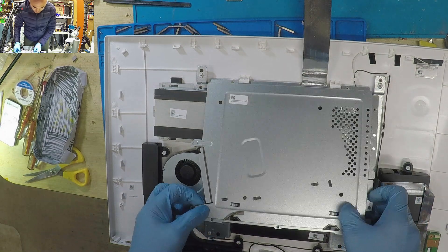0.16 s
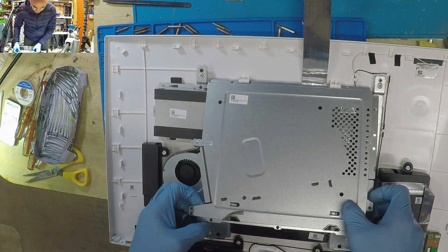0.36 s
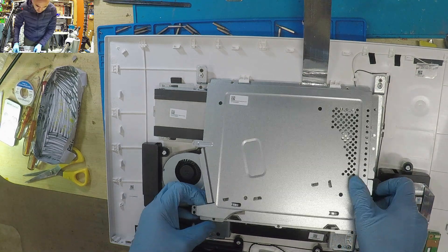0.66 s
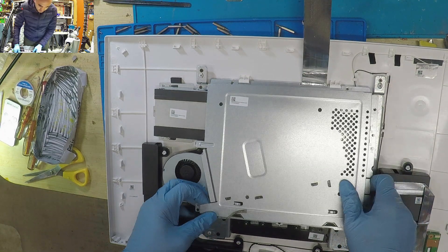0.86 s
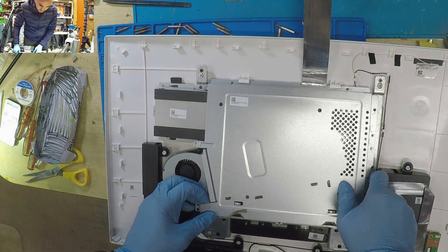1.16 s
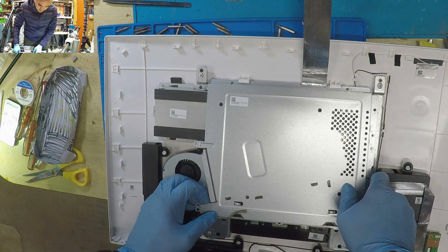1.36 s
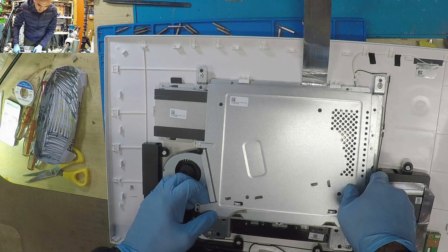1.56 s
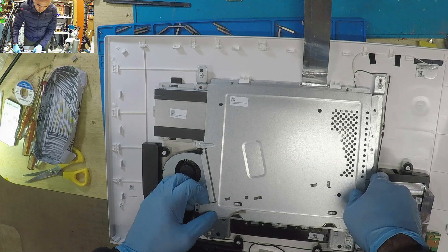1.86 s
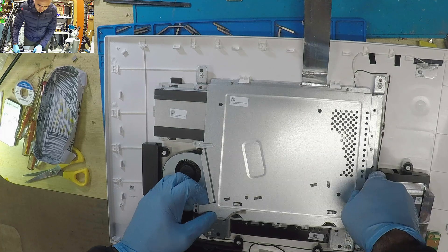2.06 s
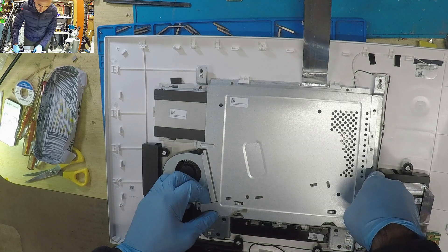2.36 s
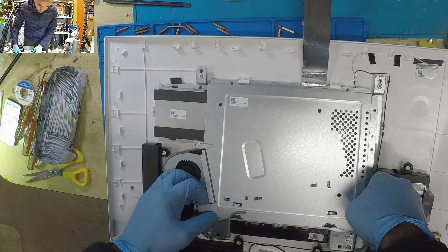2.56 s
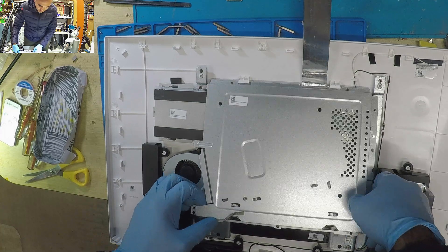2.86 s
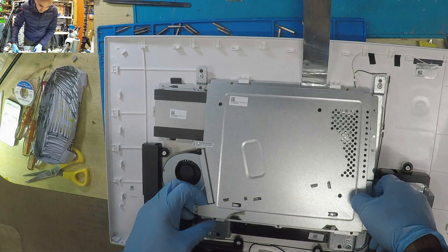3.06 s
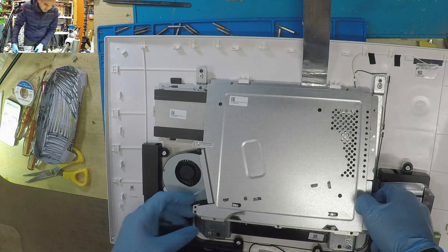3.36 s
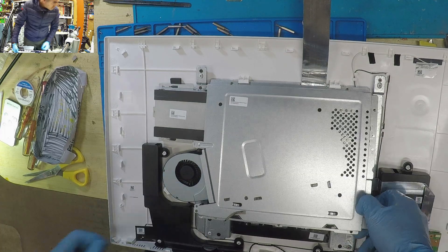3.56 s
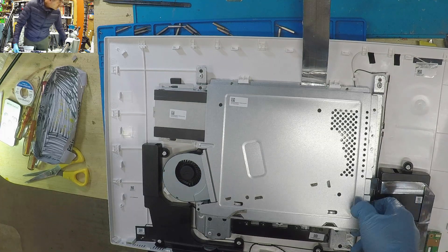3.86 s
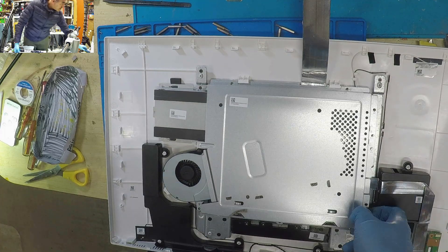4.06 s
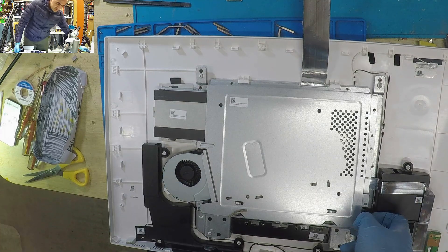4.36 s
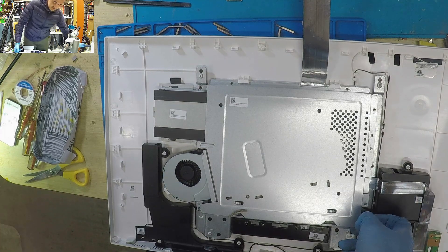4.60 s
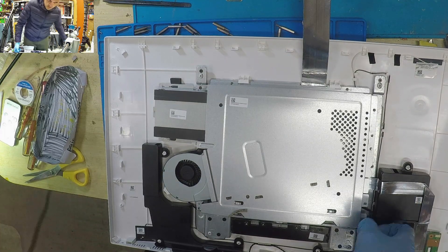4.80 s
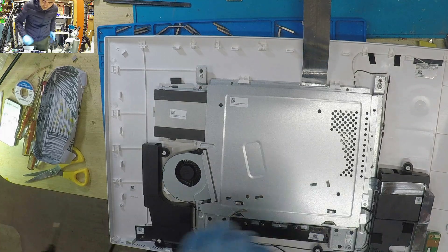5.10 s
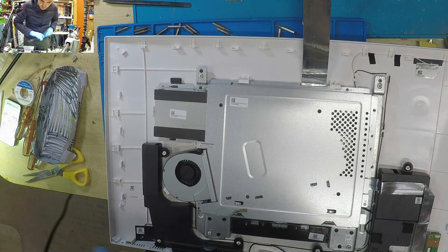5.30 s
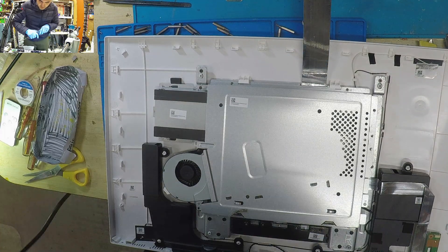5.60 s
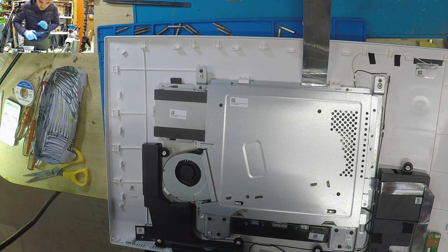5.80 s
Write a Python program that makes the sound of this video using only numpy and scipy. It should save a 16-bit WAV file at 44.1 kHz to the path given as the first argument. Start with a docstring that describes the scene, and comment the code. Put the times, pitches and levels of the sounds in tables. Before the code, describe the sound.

Close stereo sound of bench handling: deep soft thumps with short hollow ringing, quiet murmuring pressure between them, and small ticks. Early low sway fades out; a heavy thud lands midway, then another late, followed by brighter glove and sleeve scuffs and a crisp rattling knock. Faint steady air hiss fills the workshop.

```python
"""Seating a sheet-metal cover

Gloved hands press a sheet-metal cover over a board lying in a plastic shell on a workbench.
Every push and knock shakes the bench and the microphone stand: damped modes swell and ring as decaying sines.
Steady handling drives the same modes as noise-fed resonators; small parts tick in short bursts of filtered noise.
Gloves and sleeves hiss as they slide, in bands of noise, over a low rumble that dies away and a faint workshop hiss.
"""
import sys
import numpy as np
from scipy import signal
from scipy.io import wavfile

SR = 44100
rng = np.random.default_rng(int(sys.argv[2]) if len(sys.argv) > 2 else 0)


def master_out(mix):
    """Clip the mix to full scale and print it as 16-bit PCM to the path in sys.argv[1]."""
    frames = np.transpose(np.atleast_2d(mix))
    ceiling = np.clip(frames, -1, 1)
    pcm = np.round(ceiling * 32767).astype(np.int16)
    wavfile.write(sys.argv[1], SR, pcm)


N = 261954   # samples


def from_db(db):
    """Level to amplitude: 20 dB is a factor of ten."""
    return 10 ** (np.asarray(db) / 20)


def rms_one(x):
    """Power normalization: scale to rms 1."""
    return x / np.sqrt(np.mean(x ** 2) + 1e-20)


def in_time(rows):
    """Linear interpolation: the columns of a curve table, one value a sample."""
    seconds, *columns = np.transpose(rows)
    t = np.arange(N) / SR
    return [np.interp(t, seconds, column) for column in columns]


def at_hz(points, hz):
    """Logarithmic frequency scale: read a spectrum at the given frequency."""
    table_hz, values = np.transpose(points)
    return np.interp(np.log(hz), np.log(table_hz), values)


def drift(rate_hz):
    """Low-passed random fluctuation: noise at every 40th sample through a double pole; spread 1."""
    pole = np.exp(-80 * np.pi * rate_hz / SR)
    white = rng.standard_normal(N // 40 + 2002)
    slow = signal.lfilter([1], [1, -2 * pole, pole * pole], white)[2000:]   # without the run-in
    return np.interp(np.arange(N) / 40, np.arange(len(slow)), rms_one(slow))


def sides(angle):
    """Mid-side panning: left and right gain of a mode from its angle, alike on both sides, on one side only, or
    opposed."""
    return np.array([np.cos(angle) + np.sin(angle), np.cos(angle) - np.sin(angle)])


def swell(t, rise, t60):
    """Forced growth and free decay: a smooth rise, then a fall of 60 dB in t60 seconds."""
    growth = np.sin(np.pi / 2 * np.minimum(t / rise, 1)) ** 2
    return growth * from_db(-60 * np.maximum(t - rise, 0) / t60)


# Balance of the microphone pair. Each row: frequency in Hz, left minus right in dB.
PAIR_BALANCE = [(100, -2.5), (300, -6.5), (1000, 0.5), (6000, 1), (9000, -2.5), (14000, 0)]


def banded_noise(spectrum, likeness, patchy_db):
    """Third-octave synthesis: stereo noise bands with own level, flicker and likeness, as (Hz, band), rms 1 in sum."""
    lowest, highest = spectrum[0][0], spectrum[-1][0]
    edges = lowest * 2 ** np.arange(0, np.log2(highest / lowest) + 1 / 3, 1 / 3)
    white = rng.standard_normal((2, 2, N))   # neighbouring bands get unrelated noise
    opposed = np.array([[1], [-1]])
    bands = []
    for k, (low, high) in enumerate(zip(edges, edges[1:])):
        band_filter = signal.butter(2, [low, high], "band", fs=SR, output="sos")
        mid, side = signal.sosfilt(band_filter, white[k % 2])
        hz = np.sqrt(low * high)
        alike = np.clip(at_hz(likeness, hz), -1, 1)
        pair = np.sqrt(1 + alike) * mid + np.sqrt(1 - alike) * side * opposed
        flicker_db = patchy_db * drift(22)
        gain = from_db(at_hz(spectrum, hz) + flicker_db + at_hz(PAIR_BALANCE, hz) / 2 * opposed)
        bands.append((hz, gain * pair))
    total = np.sqrt(np.mean(sum(band for hz, band in bands) ** 2))
    return [(hz, band / total) for hz, band in bands]


# Spectrum of the workshop hiss. Each row: frequency in Hz, relative level in dB per Hz.
WORKSHOP_SPECTRUM = [(59, -59), (100, -43), (140, -6.5), (209, -8.5), (275, 0.5), (355, -11.5), (457, -7),
                     (641, -8.5), (792, -6), (2270, -22), (2990, -26.5), (5000, -33), (5900, -25),
                     (7260, -24.5), (9970, -28), (15500, -44)]
# Its stereo likeness. Each row: frequency in Hz, left-right likeness from -1 (opposed) to 1 (alike).
WORKSHOP_LIKENESS = [(50, 0.92), (200, 0.85), (320, -0.78), (700, -0.87), (1200, -0.7), (2200, -0.49),
                     (3800, 0.33), (6000, -0.03), (15000, -0.084)]
WORKSHOP_DB = -48.5


def workshop():
    """Stationary broadband noise: air and microphone hiss at an almost constant level."""
    bands = banded_noise(WORKSHOP_SPECTRUM, WORKSHOP_LIKENESS, patchy_db=-0.5)
    return from_db(WORKSHOP_DB) * sum(band for hz, band in bands)


# Low sway of the stand. Each row: time in seconds, pitch in Hz, level in dB.
STAND_SWAY = [(0, 52, -33), (.3, 53.1, -34.5), (.58, 52.8, -35.5), (.72, 45.3, -28), (.79, 44.4, -45.5),
              (.93, 48.6, -34.5), (1.07, 57.63, -41), (1.3, 50.7, -44), (1.77, 48.44, -51),
              (1.98, 46.26, -45.5), (2.1, 44.96, -52), (2.3, 45, -85), (5, 52.6, -85), (5.2, 53, -67),
              (5.94, 57.1, -66)]
# Level of the low noise. Each row: time in seconds, level in dB.
RUMBLE_LEVEL = [(0, -35), (.5, -40.5), (.8, -35.5), (1.1, -40.5), (1.9, -47.5), (2.1, -52.5), (3.2, -59.5),
                (3.5, -66), (4.8, -68), (5.94, -71)]
# Spectrum of the low noise. Each row: frequency in Hz, relative level in dB per Hz.
RUMBLE_SPECTRUM = [(12, -46), (20, 3), (38, 0), (55, 1), (84, -5), (110, -9), (140, -36), (240, -120)]


def rumble():
    """Frequency modulation over random noise: the stand sways as a wavering low tone, nearly alike on both sides."""
    hz, level_db = in_time(STAND_SWAY)
    turns = np.cumsum(hz * (1 + 0.015 * drift(2.8))) / SR
    strength = np.sqrt(2) * from_db(level_db + 1.5 * drift(3.9))   # the root makes the level an rms
    tone = strength * np.sin(2 * np.pi * turns) * sides(0.067)[:, None]
    bands = banded_noise(RUMBLE_SPECTRUM, [(20, 1.0), (130, 0.81)], patchy_db=0.5)
    noise_db, = in_time(RUMBLE_LEVEL)
    return tone + from_db(noise_db) * sum(band for hz, band in bands)


# Strokes of gloves and sleeves. Each row: top of the stroke in seconds, level in dB,
# rise in seconds, fall in seconds, brightness in dB.
STROKES = [(1.47, -60.5, 0.11, 0.069, 0), (2.42, -60.5, 0.062, 0.044, -2), (3.52, -47, 0.082, 0.23, 5),
           (4.352, -48.5, 0.19, .17, 4.5), (5.05, -51, 0.19, 0.39, 3.5), (5.31, -44.5, 0.075, 0.068, 8),
           (5.46, -48.5, 0.13, 0.33, 6), (5.619, -46.5, 0.062, 0.065, 9.5), (5.745, -37, 0.034, 0.037, 11),
           (5.9, -47.5, 0.093, 0.24, 4)]
# Spectrum of the rubbing hiss. Each row: frequency in Hz, relative level in dB per Hz.
RUB_SPECTRUM = [(410, -32), (700, 5.5), (1020, -18.5), (1180, -1.5), (1560, -10), (1900, -6.5), (2490, -9),
                (3110, -6.5), (4770, -12.5), (7600, -6.5), (15500, -27.5)]
# Its stereo likeness. Each row: frequency in Hz, left-right likeness from -1 (opposed) to 1 (alike).
RUB_LIKENESS = [(700, -0.6), (1400, 0.32), (2500, 0.57), (3800, 0.7), (5500, 0.4), (9000, 0.35),
                (15000, -0.86)]
RESTING_DB, EDGE_DROP_DB = -63, 10.5   # hiss between strokes; fall of a stroke over its rise or fall time
DULL_DB, SIZZLE_DB = 2, -5   # at zero brightness: added below 5 kHz, above 8.5 kHz
SIZZLE_SHARE = .4   # share of the brightness gained above 8.5 kHz


def sliding():
    """Friction noise: rubber and cloth rub over smooth parts, a grainy hiss that swells with each stroke."""
    t = np.arange(N) / SR
    power, weighted_db = from_db(2 * RESTING_DB), 0   # twice the dB gives power
    for top_s, top_db, rise, fall, bright_db in STROKES:
        distance = np.where(t < top_s, (top_s - t) / rise, (t - top_s) / fall)
        stroke = from_db(2 * (top_db - EDGE_DROP_DB * distance))
        power = power + stroke
        weighted_db = weighted_db + bright_db * stroke
    brightness_db = weighted_db / power
    dull = from_db(DULL_DB - brightness_db)
    sizzle = from_db(SIZZLE_DB + SIZZLE_SHARE * brightness_db)
    hiss = 0
    for hz, band in banded_noise(RUB_SPECTRUM, RUB_LIKENESS, patchy_db=0.5):
        tint = dull if hz < 5000 else sizzle if hz > 8500 else 1
        hiss = hiss + band * tint
    grain = from_db(1.07 * drift(47))
    return np.sqrt(power) * grain * hiss


# Small hard contacts. Each row: start in seconds, level in dB, pitch in Hz, t60 in seconds,
# broad crack in dB relative to the level, hollow body in dB relative to the level.
TICKS = [(.954, -57, 2090, 0.059, -3, 1), (1.432, -56, 2550, 0.048, -3, -12),
         (1.457, -52.5, 3210, 0.027, -3, -15), (1.483, -49, 2700, 0.024, -3, -5),
         (2.338, -58, 1960, 0.16, -4, 7), (2.412, -52.5, 3900, .05, 2, -0.5),
         (4.1149, -47, 4020, 0.046, 3, 5), (5.435, -40.5, 6700, .024, -0.5, -11.5),
         (5.68, -47.5, 9300, 0.034, -10, -20), (5.79, -37.5, 8720, 0.031, -16, -21),
         (5.808, -43, 2280, 0.028, -3, 14), (5.879, -48, 6060, 0.034, 4, 1)]


def ticks():
    """Impulsive excitation: a hard edge catches, a short crack with a hump at its pitch and a hollow shell note."""
    out, t = np.zeros((2, N + SR)), np.arange(SR // 8) / SR
    for start_s, level_db, hz, t60, broad_db, body_db in TICKS:
        t60 = max(t60, .005)
        noise = rng.standard_normal((2, len(t)))
        noise = noise[0] + 0.42 * noise[1] * [[1], [-1]]
        layers = []
        for edges in [(hz * .75, hz * 1.2), (2000, 8800), (900, 2000)]:
            band = signal.butter(4, edges, "band", fs=SR, output="sos")
            layers.append(rms_one(signal.sosfilt(band, noise)))
        hump, broad, body = layers
        crack = (hump + from_db(broad_db) * broad) * swell(t, 0.0013, t60)
        hollow = from_db(body_db) * body * swell(t, 0.0011, 2.65 * t60)
        at = round(start_s * SR)
        out[:, at:at + len(t)] += from_db(level_db) * (crack + hollow)
    return out[:, :N]


# Modes of bench, shell and cover. Each row: frequency in Hz, relative level in dB, nominal t60 in seconds,
# stereo angle in radians (0 centre, -0.8 right only, 1.57 opposed).
BODY_MODES = [(145.5, -3.5, 0.41, 0.72), (173.3, -5.5, 0.24, 0.34), (194.2, -0.5, 0.23, -0.19),
              (205.84, -1.5, 0.34, -0.18), (223.4, -0.5, 0.32, -0.17), (285, -2, 0.11, -1),
              (319.7, -2.5, 0.52, -1.11), (352, -7, 0.14, 0.5), (402.6, 2.5, 0.19, -1),
              (447.5, 3.5, 0.16, 0.5), (483, -2, 0.3, -0.7), (570, 4.5, 0.22, 0.63), (625, 2, 0.12, 2),
              (693, 0.5, 0.25, -1.32), (757, -0.5, 0.1, -1.1), (865, 3, 0.11, -1.3),
              (1016, -1, 0.14, -1.18), (1240, -10, 0.099, 5.5), (1225, -12, 0.11, 3.4),
              (1336, -14, 0.27, 2.14), (1450, -27, 0.099, -3.5), (1777, -12, 0.07, -1.2),
              (2250, -9.5, 0.045, 0.73)]
DEEP_TOP_HZ, MIDDLE_TOP_HZ = 250, 530   # limits of the deep and middle modes
# Hands resting and shifting on the parts. Each row: time in seconds, level of the deep modes in dB,
# level of the higher modes in dB relative to the deep ones.
HANDLING = [(0, -44.5, -4.5), (.43, -50, -3.5), (.92, -44.5, -5), (1.21, -43, -2.5), (2.3, -42, -5.5),
            (2.9, -45, -3.5), (3.47, -49.5, -0.5), (3.75, -40.5, -10), (4.7, -47.5, -10), (5.18, -44, -2),
            (5.6, -47.5, -15.5), (5.94, -46, 11.5)]


def handling():
    """Randomly forced resonance: an unsteady pressure keeps the lowest 17 modes murmuring."""
    deep_db, higher_db = in_time(HANDLING)
    deep, higher = np.zeros((2, N)), np.zeros((2, N))
    for hz, mode_db, t60, angle in BODY_MODES[:17]:
        pole = from_db(-60 / (0.45 * t60 * SR))   # damped faster than a free mode
        w = 2 * np.pi * hz / SR
        push = rng.standard_normal((2, N)) * from_db(4.7 * drift(6.8))
        ringing = signal.lfilter([1], [1, -2 * pole * np.cos(w), pole * pole], push)
        main, stray = rms_one(ringing)
        upper_db = -13.0 if hz > MIDDLE_TOP_HZ else 0
        pair = np.outer(sides(angle), main) + 0.3 * np.outer(sides(angle + np.pi / 2), stray)
        heard = from_db(mode_db + upper_db) * pair
        if hz < DEEP_TOP_HZ:
            deep += heard
        else:
            higher += heard
    murmur = rms_one(deep) + from_db(higher_db) * rms_one(higher)
    return from_db(deep_db + 1.16 * drift(6.3)) * murmur


# Pushes and knocks. Each row: top of the push in seconds, level of the deep modes in dB, favoured deep pitch in Hz,
# middle modes in dB relative to that level, upper modes in dB relative to that level, contact in milliseconds,
# share of the ringing time left by the hands (held between 0.1 and 3 in use).
KNOCKS = [(.33, -55.5, 202, 6.5, 1, 51, 1.4), (.628, -22.5, 206, -9.5, -21, 19, 0.94),
          (1.035, -34, 205, -8.5, -15.5, 20, 3.5), (1.115, -28.5, 200, -5, -23.5, 78, 2.5),
          (1.144, -24.5, 189.4, -4.5, -18, 32, .3), (1.44, -47.5, 201, 4.5, -11, 42, 1.7),
          (1.466, -31, 190, -12, -23.5, 24, .27), (1.498, -26.5, 203, -18, -27, 33, 0.26),
          (1.818, -37.5, 206, -10, -25.5, 91, 4), (2.075, -38, 209, -11, -24.5, 25, 1.1),
          (2.257, -40.5, 199, -1, -19, 39, 1.1), (2.346, -38, 196, -11, -12, 15, .6),
          (2.377, -17, 178.7, -12.5, -27, 29, 1.18), (2.436, -36, 214, -0.5, -11, 27, 2.26),
          (2.733, -39.5, 203, -13, -19, 144, 0.86), (2.887, -32, 197, -9, -23, 79, 1.16),
          (2.985, -36.5, 204, -4.5, -23, 31, 1.1), (3.201, -35, 190, -16.5, -23, 15, 1.1),
          (3.372, -26, 229, -23, -38, 29, .63), (3.842, -33.5, 207, -26, -22, 57, 0.82),
          (4.085, -33, 203, -14.5, -26, 37, 3.4), (4.124, -41, 201, -4.5, -5.5, 14, 0.63),
          (4.148, -30.5, 223, -5, -13, 25, 0.74), (4.202, -37.5, 226, -18.5, -18, 19, 0.44),
          (4.992, -17.5, 224.4, -17, -22, 14.6, 0.76), (5.091, -28.5, 172, -6, -20, 19.7, 1.1),
          (5.197, -42, 203, -8, -5, 28, 1.2), (5.289, -40.5, 228, -8, -25, 32, 2.4),
          (5.62, -34, 218, -5.5, -34, 9.7, 1.42), (5.82, -19.5, 211, 0, -2, 12.5, 0.67),
          (5.865, -36.5, 197, 5, -6, 31, 1.6)]
RATTLE_HZ, RATTLE_DB, RATTLE_T60_S = (650, 1500), -7, .3   # loose parts; dB relative to upper modes; t60 before ring share
RISE_LAG_S = .014   # modes above 200 Hz swell in less time, by up to nearly this much
SOFTENS = .3   # dB per octave lost above 1 kHz for each dB that the upper modes lie under the deep ones


def knocks():
    """Modal excitation: each push swells into the modes over its contact; where it lands sets which speak."""
    hz, mode_db, t60, angle = np.transpose(BODY_MODES)
    deep = hz < DEEP_TOP_HZ
    out, t = np.zeros((2, N + SR)), np.arange(SR // 3)[:, None] / SR
    chance = rng.standard_normal((len(KNOCKS), 3, len(BODY_MODES)))
    rattle_band = signal.butter(3, RATTLE_HZ, "band", fs=SR, output="sos")
    for row, (strength, turn, phase) in zip(KNOCKS, chance):
        top_s, level_db, deep_hz, middle_db, upper_db, contact_ms, ring = row
        contact, ring = max(contact_ms, 1) / 1000, np.clip(ring, .1, 3)
        deep_db = np.maximum(-6.0 * ((hz - deep_hz) / 20.0) ** 2, -15)
        higher_db = np.where(hz < MIDDLE_TOP_HZ, middle_db, upper_db)
        group_db = np.where(deep, deep_db, higher_db)
        group_db += SOFTENS * min(upper_db, 0) * np.log2(np.maximum(hz / 1000, 1))
        rise = np.maximum(contact - RISE_LAG_S * np.maximum(1 - 200 / hz, 0), .0015)
        # the deep modes top out nearly in phase, then beat against each other
        phases = 2 * np.pi * hz * (t - rise) + np.where(deep, .3, 3) * phase
        waves = swell(t, rise, t60 * ring) * np.sin(phases)
        gains = from_db(level_db + mode_db + group_db + 1.0 * strength) * sides(angle + .1 * turn)
        noise = signal.sosfilt(rattle_band, rng.standard_normal((2, len(t))))
        rattle = rms_one(.5 * noise[0] + noise[1] * [[1], [-1]])
        rattle = rattle * swell(t.T, rise[-1], RATTLE_T60_S * ring)
        at = round((top_s - contact) * SR)
        out[:, at:at + len(t)] += gains @ waves.T + from_db(level_db + upper_db + RATTLE_DB) * rattle
    return out[:, :N]


def scene():
    """Superposition: all sources add; below the deepest bench mode little but the rumble remains."""
    bench = knocks() + handling() + ticks() + sliding() + workshop()
    low_cut = signal.butter(9, 138.4, "high", fs=SR, output="sos")
    return signal.sosfilt(low_cut, bench) + rumble()


def record(dry):
    """Band limitation: an elliptic low-pass cuts the top steeply at 15690 Hz."""
    return signal.sosfilt(signal.ellip(12, .5, 70, 15690, fs=SR, output="sos"), dry)


dry = scene()
out = record(dry)
master_out(out)
```